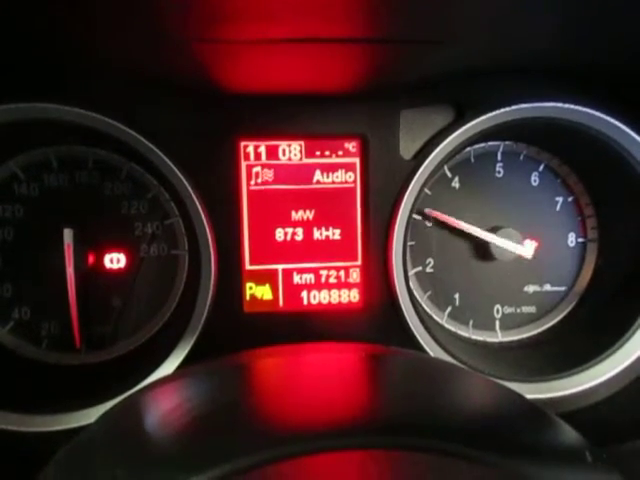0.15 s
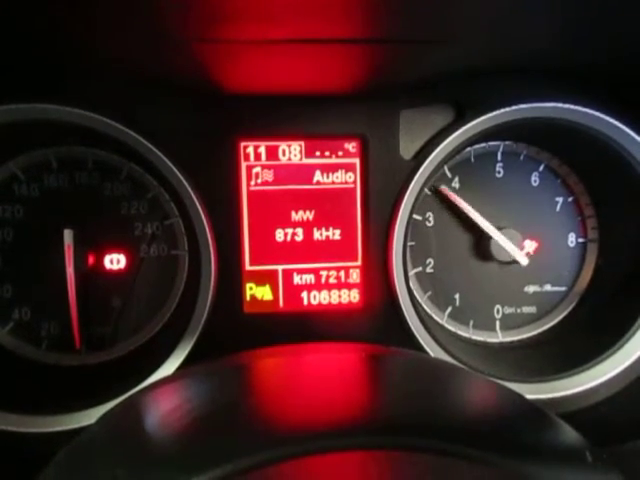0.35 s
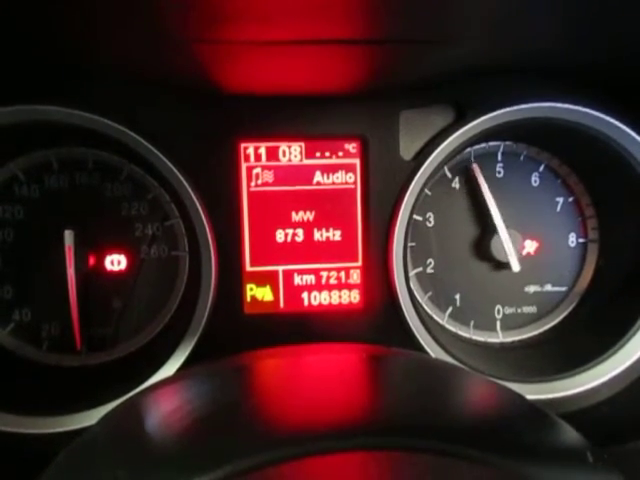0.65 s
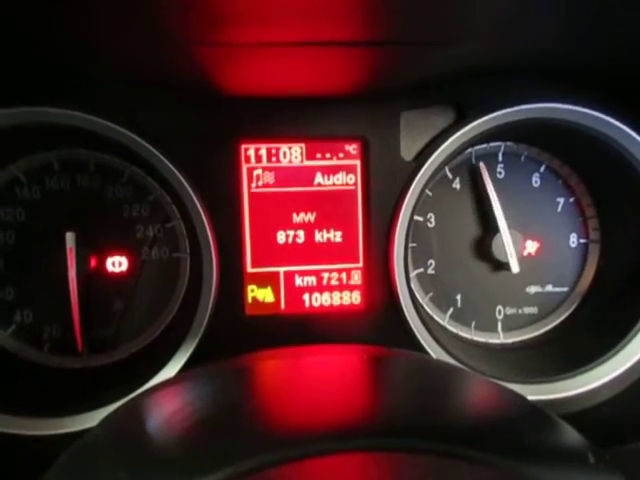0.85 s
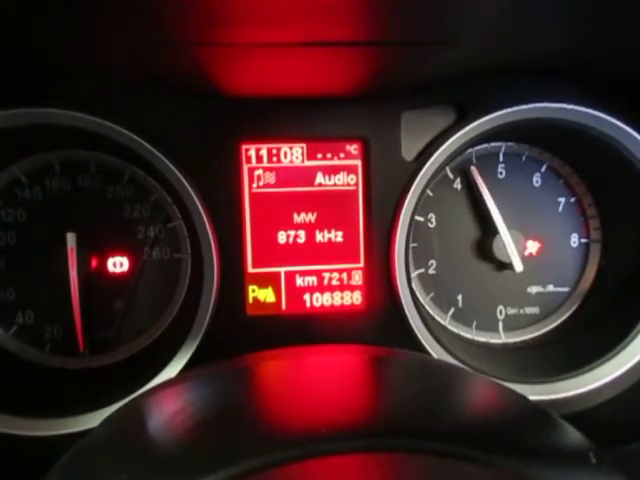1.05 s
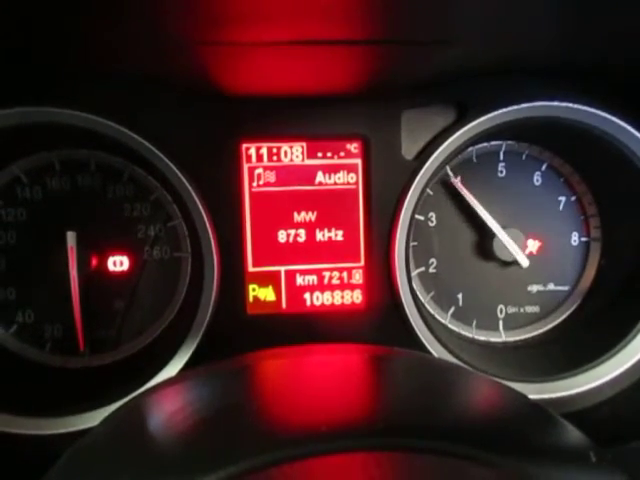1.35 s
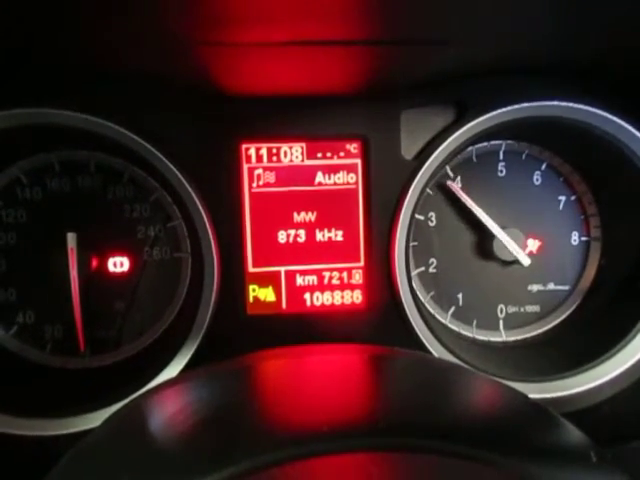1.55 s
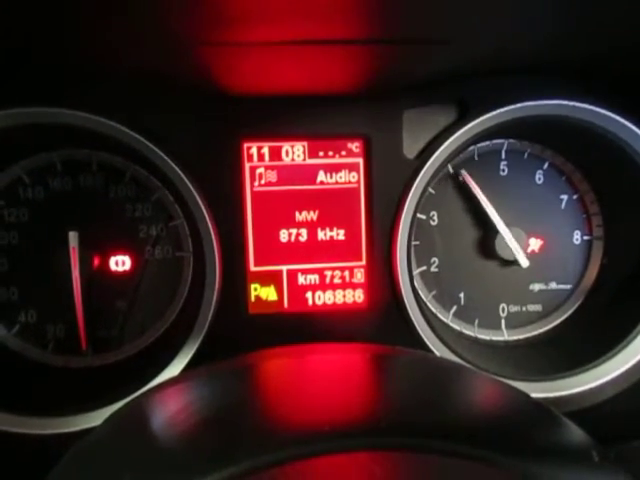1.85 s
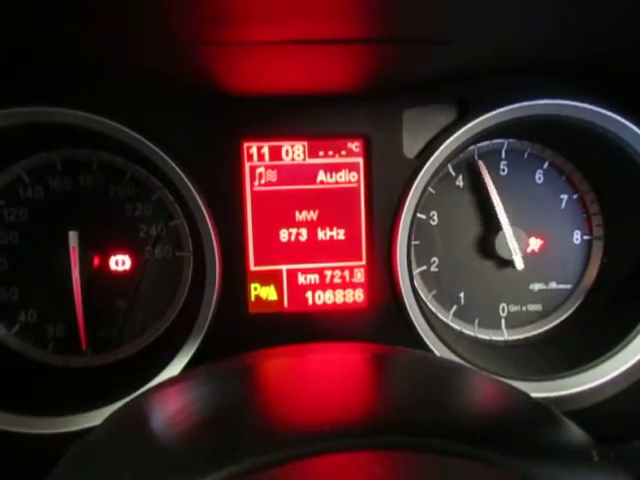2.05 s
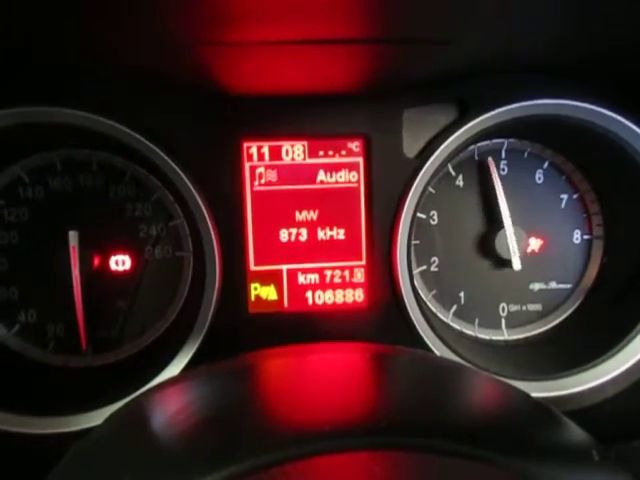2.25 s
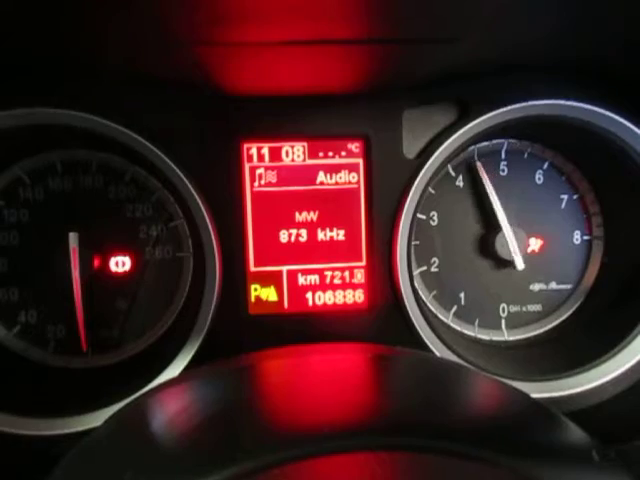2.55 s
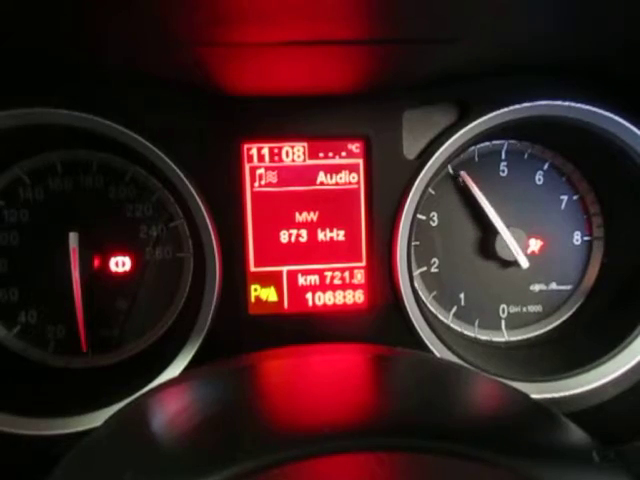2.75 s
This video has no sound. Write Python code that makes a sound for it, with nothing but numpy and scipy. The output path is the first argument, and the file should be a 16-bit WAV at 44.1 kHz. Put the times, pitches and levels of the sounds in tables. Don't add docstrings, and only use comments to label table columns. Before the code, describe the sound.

Inside a stationary car, a four-cylinder engine blips up, drops, climbs again and falls away

```python
import sys
import numpy as np
from scipy import signal
from scipy.fft import rfft, irfft
from scipy.io import wavfile
from scipy.ndimage import uniform_filter1d

SR = 44100
rng = np.random.default_rng(int(sys.argv[2]) if len(sys.argv) > 2 else 0)


def store_pcm(level_fs):
    pcm = np.round(np.clip(level_fs, -1, 1) * 32767).astype(np.int16)
    wavfile.write(sys.argv[1], SR, np.atleast_2d(pcm).T)


def field_ratio(decibels):
    return 10 ** (np.asarray(decibels, dtype=float) / 20)


N = 127890


def rms_one(x):
    return x / np.sqrt(np.mean(x ** 2) + 1e-20)


def at_hz(points, hz):
    table_hz, table_db = np.transpose(points)
    return np.interp(np.log(hz), np.log(table_hz), table_db)


def over_time(points):
    return np.interp(np.arange(N) / SR, *np.transpose(points))


def smooth(x, seconds):
    size = max(int(seconds * SR / 2), 1)
    once = uniform_filter1d(x, size=size, mode="nearest")
    return uniform_filter1d(once, size=size, mode="nearest")


def drift(rate_hz):
    r = np.exp(-2 * np.pi * rate_hz * 40 / SR)
    white = rng.standard_normal(N // 40 + 2002)
    slow = signal.lfilter([1], [1, -2 * r, r * r], white)[2000:]
    return np.interp(np.arange(N) / 40, np.arange(len(slow)), rms_one(slow))


def coloured(x, spectrum, skirt_db):
    hz = np.maximum(np.arange(N // 2 + 1) * SR / N, 1)
    octaves_outside = np.abs(np.log2(hz / np.clip(hz, spectrum[0][0], spectrum[-1][0])))
    gain = field_ratio(at_hz(spectrum, hz) + skirt_db * octaves_outside)
    return rms_one(irfft(rfft(x) * gain, N))


def resonance(x, hz, width_hz):
    r = np.exp(-np.pi * width_hz / SR)
    b = [(1 - r * r) / 2, 0, (r * r - 1) / 2]
    a = [1, -2 * r * np.cos(2 * np.pi * hz / SR), r * r]
    return signal.lfilter(b, a, x)


def crank():
    # time in seconds, firing rate in Hz.
    speed = [(0, 115.1), (.1, 123.2), (.2, 134), (.4, 151.4), (.55, 159.7), (.7, 152.2), (.9, 139.1),
             (1, 135.6), (1.1, 128.2), (1.2, 124), (1.36, 125.2), (1.6, 138.3), (1.9, 157.9), (2.02, 163.4),
             (2.3, 147.8), (2.6, 129.8), (2.9, 114.5)]
    # time in seconds, throttle opening 0-1.
    pedal = [
        (0, 1),
        (.555, 0.97),
        (.605, 0),
        (1.2, 0.05),
        (1.36, 0.99),
        (1.94, 0.99),
        (2.08, 0.03),
        (2.9, 0.02),
    ]
    hz = smooth(over_time(speed), .1)
    phase = 2 * np.pi * np.cumsum(hz) / SR
    return hz, phase, np.clip(over_time(pedal), 0, 1)


def firing_orders(hz, phase, pull):
    # frequency in Hz, rms level in dB.
    boom_pulling = [(114, -22), (123, -8.5), (133, -16.5), (141, -12.5), (147, -15.5), (154, -13),
                    (158, -12.5), (163, -32)]
    boom_coasting = [(115, -13.5), (121, -10), (130, -26.5), (137, -10), (143.5, -21), (150, -9.5),
                     (157, -16), (162, -12)]
    second_pulling = [(228, -45.5), (250, -19.5), (262, -29), (283, -24), (297, -26.5), (306, -52),
                      (318, -26.5), (326, -19)]
    second_coasting = [(232, -41), (248, -18.5), (259, -26), (272, -19.5), (290, -24.5), (303, -32),
                       (318, -16.5), (326, -26)]
    third_pulling = [(345, -32), (365, -40), (376, -34), (400, -41), (435, -27.5), (452, -31), (478, -29.5),
                     (490, -28)]
    third_coasting = [(345, -23.5), (360, -40.5), (374, -24.5), (392, -46.5), (430, -30), (452, -35),
                      (480, -27.5), (490, -31)]
    fourth_pulling = [(465, -35), (500, -31), (525, -34), (548, -44), (580, -38), (608, -39), (640, -29),
                      (655, -28)]
    fourth_coasting = [(465, -36.5), (492, -31), (520, -40), (548, -35), (580, -37.5), (608, -31),
                       (640, -33), (655, -13)]
    cabin = [(boom_pulling, boom_coasting), (second_pulling, second_coasting),
             (third_pulling, third_coasting), (fourth_pulling, fourth_coasting)]
    wander_db, cabin_lag_s = 1.2, .02
    lifting = np.gradient(pull) < 0
    lift_dip_db = -15 * np.sin(np.pi * pull) ** 2 * lifting
    out = np.zeros(N)
    for k, (pulling, coasting) in enumerate(cabin, 1):
        db = pull * at_hz(pulling, k * hz) + (1 - pull) * at_hz(coasting, k * hz)
        db += wander_db * k * drift(21.4)
        if k == 1:
            db += lift_dip_db
        angle = k * phase - .7 * k * k + .09 * k * drift(6.0)
        out += smooth(field_ratio(db), cabin_lag_s) * np.cos(angle)
    return np.sqrt(2) * out


def uneven_cylinders(phase):
    # multiple of the firing rate, rms level in dB, wander in dB.
    minor = [(.25, -34, 4), (.5, -40, 3), (.75, -38, 1.5), (1.25, -34, 3), (1.5, -33, 3), (1.75, -32, 3),
             (2.25, -38, 3), (2.5, -37, 3), (3.25, -43, 3), (3.5, -41, 3), (4.5, -47, 3), (5, -45, 3)]
    out = np.zeros(N)
    for multiple, db, wander_db in minor:
        level = field_ratio(db + wander_db * drift(3.86))
        out += level * np.sin(multiple * phase + 0.94 * drift(5.85) + rng.uniform(0, 2 * np.pi))
    return np.sqrt(2) * out


def belt_pump(hz, phase):
    # frequency in Hz, rms level in dB.
    belt = [(160, -29), (180, -35), (200, -27.5), (222, -24.5)]
    ratio = 1.375
    level = field_ratio(at_hz(belt, ratio * hz) + 4.6 * drift(8.2))
    return np.sqrt(2) * level * np.sin(ratio * phase + 0.81 * drift(8.3))


def engine_load():
    # time in seconds, level in dB.
    load = [(0, -28), (.04, -23.5), (.12, -25), (.25, -25.5), (.45, -22.5), (.58, -22.5), (.64, -21.5),
            (0.719, -23.5), (.95, -25), (1.3, -25.5), (1.7, -24.5), (1.95, -22), (2.07, -21), (2.2, -23),
            (2.33, -25.5), (2.6, -26.5), (2.9, -26.5)]
    load_db = over_time(load)
    return load_db - load_db.mean()


def pulsing_noise(phase):
    pulse = np.cos(phase) + 0.38 * np.cos(phase / 2) + 0.36 * np.cos(phase / 4)
    return rng.standard_normal(N) * (1 + .1 * pulse)


def rumble(load_db):
    # frequency in Hz, density in dB per Hz.
    spectrum = [(18, -26), (33, -4.5), (80, 0.5), (110, 5.5), (200, -2.5), (330, -6), (560, -9),
                (800, -17.5)]
    return coloured(rng.standard_normal(N), spectrum, skirt_db=-47) * field_ratio(-25.5 + load_db)


def valve_clatter(phase, load_db):
    # frequency in Hz, density in dB per Hz.
    spectrum = [(830, -15), (1100, -3.5), (1520, -5), (2300, -2), (3100, -13), (3750, -10.5), (4400, -19),
                (4800, -32)]
    # frequency in Hz, width in Hz, level in dB.
    panels = [(1145, 44, -19.5), (1366, 74, -22), (1860, 170, -23), (2402, 40, -19.5), (2964, 260, -15),
              (3520, 66, -24)]
    noise = coloured(pulsing_noise(phase), spectrum, skirt_db=-60)
    high_orders = sum(field_ratio(1.54 * drift(6.1)) * np.sin(k * phase + .5 * drift(5.7)) for k in range(7, 17))
    clatter, lines = noise.copy(), np.zeros(N)
    for hz, width_hz, db in panels:
        clatter += field_ratio(db + 0.21 * load_db) * rms_one(resonance(noise, hz, width_hz))
        ringing = resonance(resonance(high_orders, hz, 2 * width_hz), hz, 2 * width_hz)
        lines += field_ratio(db - panels[0][2]) * ringing
    return field_ratio(0.91 * load_db) * (field_ratio(-26.5) * clatter + field_ratio(-31) * lines)


def fan_hiss(phase, load_db):
    # frequency in Hz, density in dB per Hz.
    spectrum = [(4800, -21), (5200, -5), (5900, -2), (8500, -2), (10500, -4.5), (12300, -9), (14000, -16.5),
                (15600, -24)]
    # frequency in Hz, width in Hz, level in dB.
    vents = [(6040, 220, -23.5), (7490, 69, -24), (8470, 150, -17.5)]
    noise = coloured(pulsing_noise(phase), spectrum, skirt_db=-60)
    ducts = sum(field_ratio(db) * rms_one(resonance(noise, hz, width_hz)) for hz, width_hz, db in vents)
    return (noise + ducts) * field_ratio(-36.5 + 0.85 * load_db + 0.29 * drift(15.0))


def block_rocking():
    # time of the peak in seconds, peak level in dB, frequency in Hz.
    rocks = [
        (.1, -24, 38),
        (0.623, -14, 39),
        (1.2, -19, 38.15),
        (2.09, -18, 39),
        (2.89, -19, 35.97),
    ]
    rise_s, fall_s = 0.014, 0.043
    out = np.zeros(N)
    for s, db, hz in rocks:
        t = np.arange(N) / SR - s
        swell = np.exp(-.5 * (t / np.where(t < 0, rise_s, fall_s)) ** 2)
        out += field_ratio(db) * swell * np.cos(2 * np.pi * hz * t)
    return out


def trim_tick():
    # start in seconds, peak level in dB.
    ticks = [
        (1.5381, -11),
    ]
    # frequency in Hz, level in dB, 60 dB decay time in seconds.
    modes = [(2650, 0, .01), (3300, -6, .005), (4150, -4, .006), (7800, -5, .007), (8900, -11, .004)]
    (start_s, peak_db), = ticks
    contact_s = start_s + .00075 * np.arange(3) ** 1.3
    touch = np.full(N, 1e-18)
    touch[(contact_s * SR).astype(int)] = .6, 1, .7
    touch = signal.lfilter(*signal.butter(2, 9000, fs=SR), touch)
    out = np.zeros(N)
    for hz, db, t60 in modes:
        out += field_ratio(db) * t60 * resonance(touch, hz, np.log(1000) / np.pi / t60)
    return field_ratio(peak_db) * out / np.abs(out).max()


def scene():
    hz, phase, pull = crank()
    load_db = engine_load()
    tones = firing_orders(hz, phase, pull) + uneven_cylinders(phase) + belt_pump(hz, phase)
    bulkhead = rumble(load_db) + valve_clatter(phase, load_db) + fan_hiss(phase, load_db)
    return (tones + bulkhead + block_rocking() + trim_tick())[None, :]


def roll_off(x):
    return signal.sosfilt(signal.butter(12, 15640, fs=SR, output="sos"), x)


def record(dry):
    mix = 1.393 * np.tanh(dry / 1.408)
    return roll_off(mix)


dry = scene()
out = record(dry)
store_pcm(out)
```